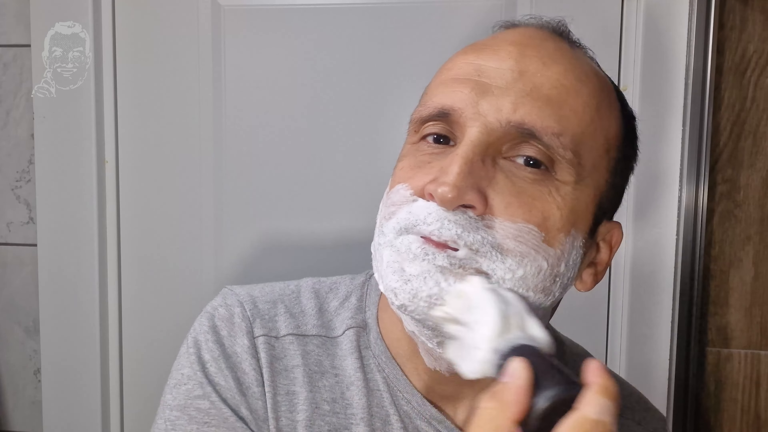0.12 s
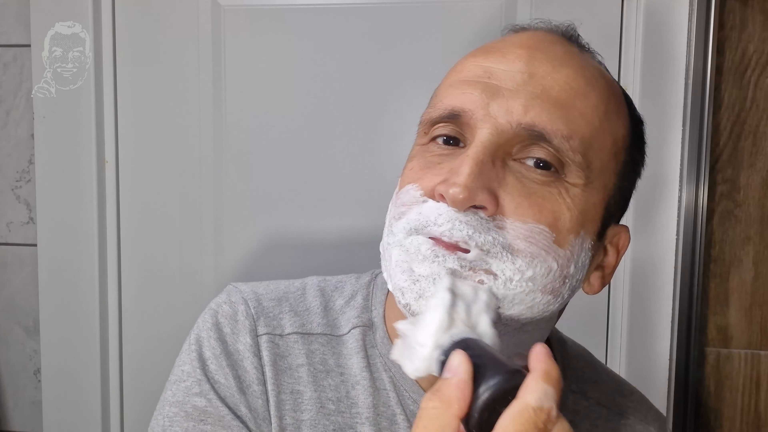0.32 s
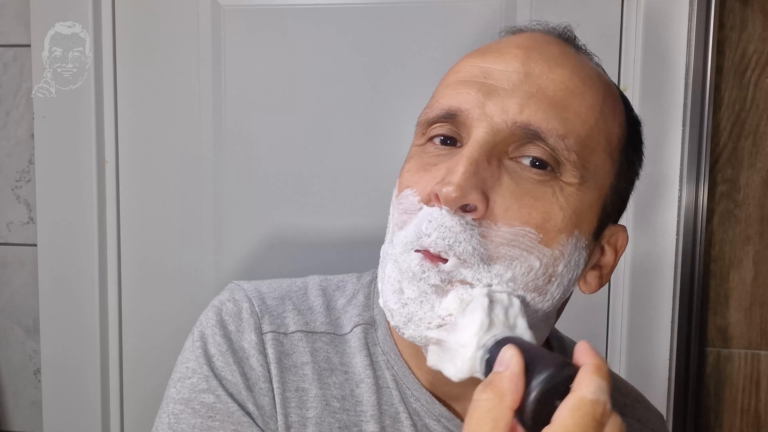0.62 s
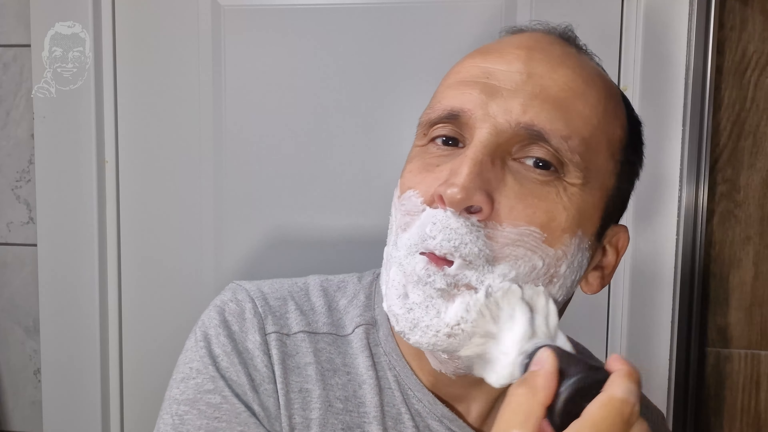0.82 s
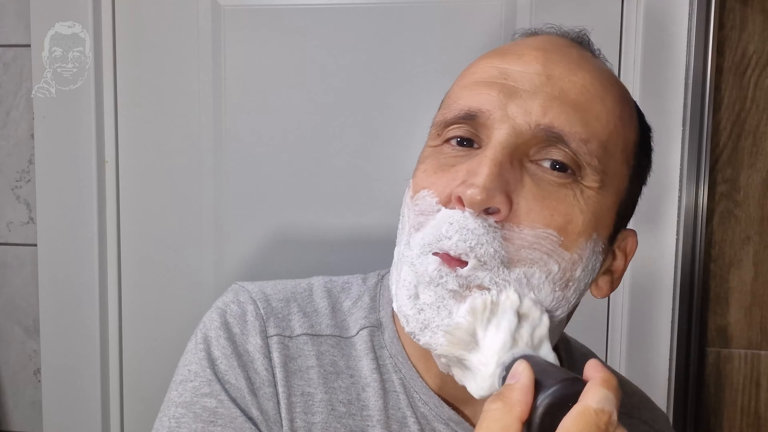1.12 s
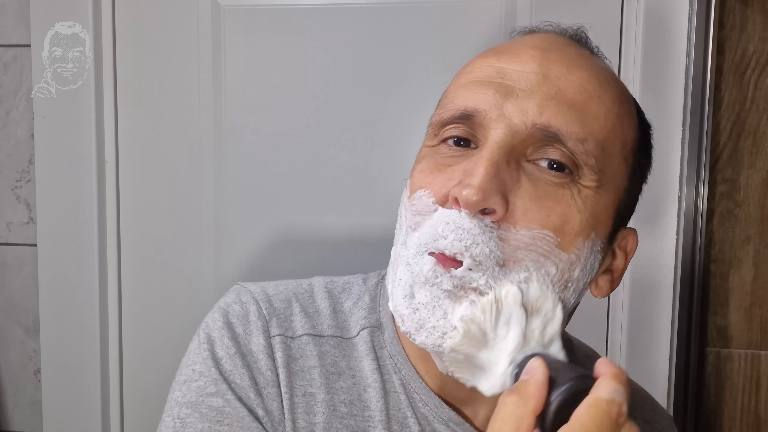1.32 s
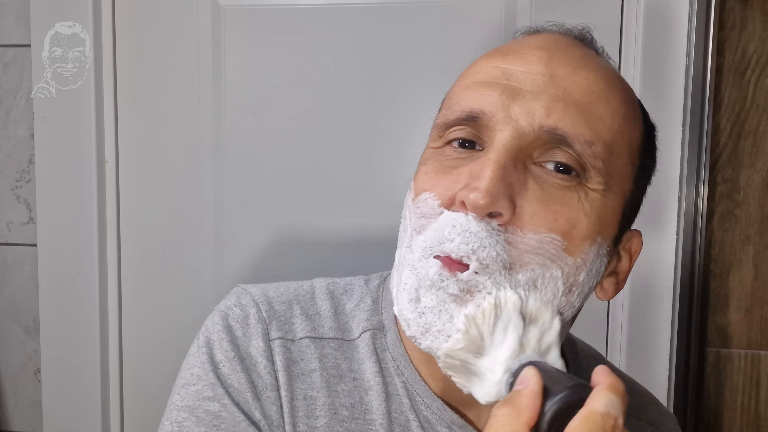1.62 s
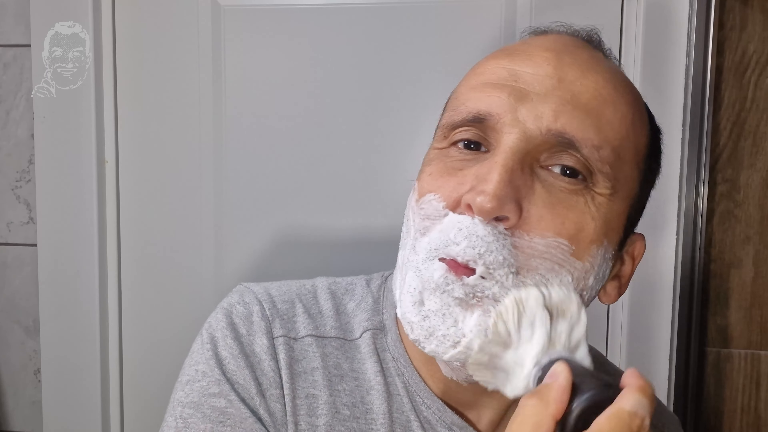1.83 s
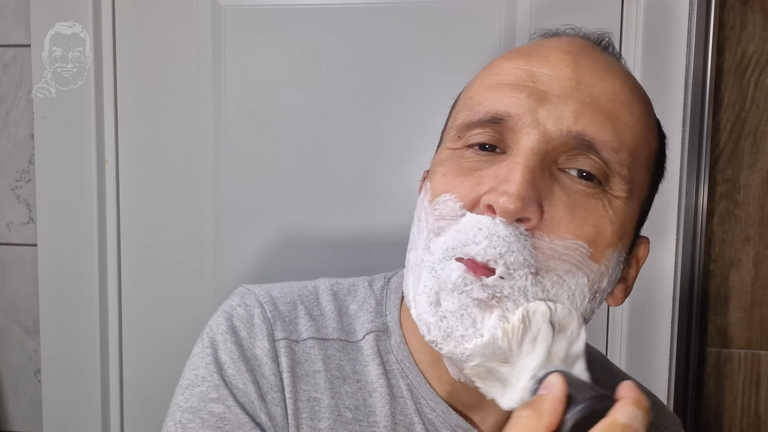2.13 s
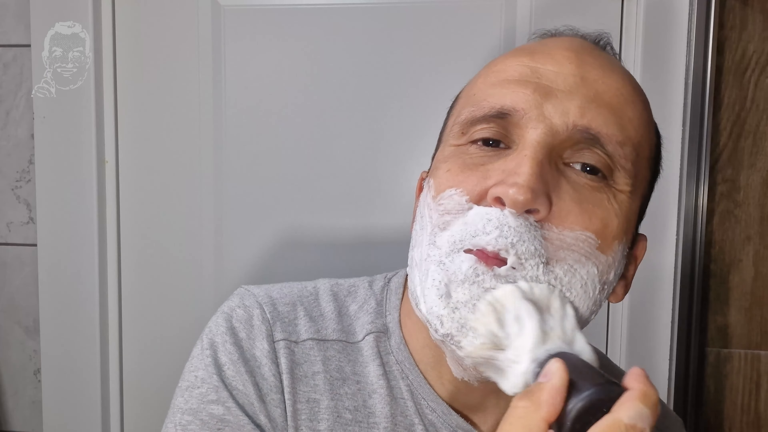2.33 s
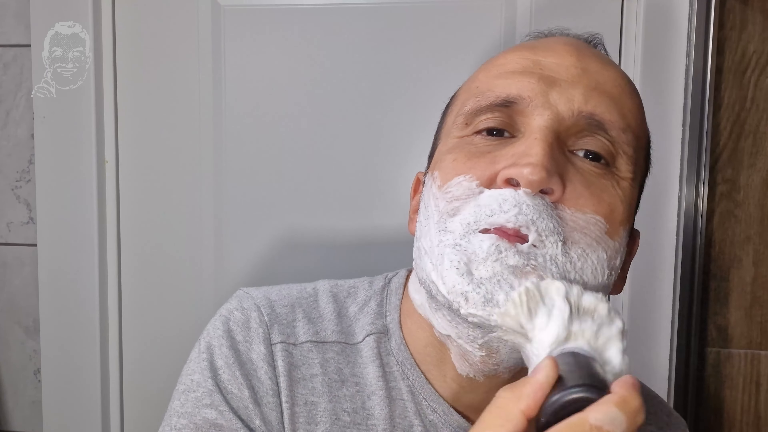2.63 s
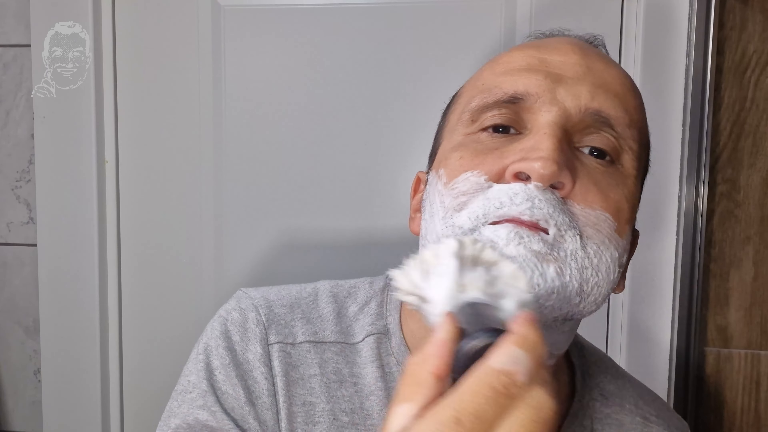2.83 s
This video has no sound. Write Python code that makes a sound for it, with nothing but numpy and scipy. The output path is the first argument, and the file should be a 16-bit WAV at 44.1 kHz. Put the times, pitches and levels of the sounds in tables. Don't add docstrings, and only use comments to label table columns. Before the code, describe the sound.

A wet shaving brush swishes over a lathered face. Strong soft strokes come at 0.25 and 0.55 s, another near 0.8, then gentler scrubs roughly every 0.1-0.15 s until 1.8, with squelch and tiny bubble pops. It thins near 1.9, brushes again at 2.05-2.45, flicks crisply at 2.7, fades, and a light airy stroke begins at 3.0. Faint hiss, short tiled echo, close phone microphone.

```python
import sys
import numpy as np
from scipy import signal
from scipy.fft import rfft, irfft
from scipy.io import wavfile
from scipy.ndimage import uniform_filter1d

SR = 44100
rng = np.random.default_rng(int(sys.argv[2]) if len(sys.argv) > 2 else 0)


def voltage_ratio(level):
    return 10 ** (np.asarray(level, float) / 20)


def digitize_waveform(pressure):
    field = np.atleast_2d(pressure).T
    bounded = np.clip(field, -1, 1)
    quanta = np.round(bounded * 32767).astype(np.int16)
    wavfile.write(sys.argv[1], SR, quanta)


N = 132300

# (frequency [Hz], density [dB per Hz])
HISS_SPECTRUM = [(18, -65), (35, -30), (80, -27.5), (300, -22), (700, -16.5), (4500, -27), (6500, -20.5),
                 (15000, -28)]
# (peak [s], rise [s], fall [s], level [dB])
PEEL_STROKES = [
    (.354, 0.003, 0.054, -52),
    (.68, 0.015, .03, -51.5),
    (.754, 0.003, 0.03, -52.5),
    (.96, 0.052, 0.066, -56),
    (1.23, 0.046, 0.027, -51.5),
    (1.49, 0.029, 0.027, -55),
    (1.703, 0.004, 0.03, -54),
    (2.29, .05, 0.04, -55.5),
    (2.49, 0.055, 0.043, -62.5),
    (2.81, 0.05, 0.058, -60.5),
]
# (start [s], peak level [dB], pitch [Hz])
BUBBLE_POPS = [(0.3517, -28, 3540), (0.674, -25, 3400), (0.7573, -35, 4050), (0.93, -33, 3630),
               (0.7508, -37, 3500), (.764, -36, 3000), (.8715, -37, 4300), (.996, -31, 3000),
               (1.107, -31, 4000), (1.237, -33, 3200), (1.246, -32, 2490), (1.4555, -35, 3500),
               (1.699, -32, 4000), (1.711, -33, 4300), (1.7182, -31, 3800), (1.741, -33, 2900),
               (1.748, -34, 2900), (1.9515, -35, 3800), (1.956, -29, 3800), (2.2965, -34, 3500),
               (2.416, -40, 4480), (2.4435, -34, 4000), (2.501, -42, 3000), (2.518, -39, 2800),
               (2.613, -44, 3500), (2.79, -41, 2900), (2.828, -43, 3000), (0.9685, -29.5, 3220),
               (1.1752, -34, 3860), (1.2292, -30, 1100), (1.5155, -36, 1100), (1.2098, -25, 4000),
               (1.225, -34, 3530), (1.2294, -20.5, 2770), (1.4745, -32, 3840), (1.489, -29, 3150),
               (1.498, -27, 3900), (1.5156, -24, 3020), (1.703, -29, 4290), (1.7259, -21.5, 3300),
               (2.162, -28, 3700), (2.2365, -37, 2870), (2.2764, -30, 2820), (2.299, -26, 3350),
               (2.4357, -34, 2970), (2.4672, -38, 3390), (2.482, -37, 2980), (2.5209, -39, 3400),
               (2.7666, -37.5, 3320), (2.806, -43, 3230), (2.886, -49, 1530)]
# (peak [s], rise [s], fall [s], level [dB], fizz relative to it [dB])
TIP_FLICKS = [(0.111, 0.053, 0.024, -61, -25), (0.237, 0.028, 0.038, -38, -35),
              (.192, .007, 0.013, -49.5, -30), (.496, 0.0082, 0.013, -50, -30),
              (.585, 0.018, .007, -46.5, -28), (2.137, 0.0055, .012, -42, -30),
              (2.115, 0.009, .012, -50.5, -25), (.84, .02, 0.022, -45, -25), (1.95, 0.037, 0.031, -52, -20),
              (0.405, 0.025, 0.027, -54.5, -16), (0.54, 0.025, 0.032, -36.5, -32),
              (0.706, 0.033, 0.022, -55.5, -28), (0.79, 0.025, 0.048, -42, -28),
              (0.979, 0.051, 0.034, -55.5, -19), (1.089, 0.025, 0.085, -46.5, -23),
              (1.248, 0.034, 0.036, -49.5, -25), (1.336, 0.011, 0.035, -41, -25),
              (1.515, 0.16, 0.058, -56.5, -18), (1.605, 0.012, 0.04, -47, -20),
              (1.714, 0.037, 0.03, -50.5, -21), (1.765, 0.011, 0.037, -53, -18),
              (1.855, 0.01, 0.059, -46, -20), (2.044, 0.021, 0.029, -54, -23),
              (2.165, 0.016, 0.022, -39.5, -34), (2.305, 0.089, 0.058, -62, -28),
              (2.436, 0.028, 0.02, -51, -14.5), (2.57, 0.053, 0.14, -65.5, -9),
              (2.711, 0.027, 0.017, -42.5, -19), (2.826, 0.064, 0.078, -68.5, -18),
              (3.038, 0.061, 0.1, -46, -12)]
# (peak [s], rise [s], fall [s], level [dB], squelch relative to it [dB])
FOAM_SCRUBS = [(0.099, 0.039, 0.039, -55.5, -11), (0.245, 0.034, 0.032, -36.5, -9.5),
               (0.378, 0.029, 0.051, -49, -11.5), (0.545, 0.036, 0.032, -38, -28),
               (.586, 0.022, .007, -44, -12), (.845, 0.019, .012, -44.5, -14), (2.046, .015, .006, -54, -9),
               (0.695, 0.048, 0.019, -52.5, -5.5), (0.81, 0.044, 0.039, -42.5, -8.5),
               (0.988, 0.047, 0.02, -45.5, -8), (1.117, 0.057, 0.072, -45.5, -7),
               (1.236, 0.045, 0.04, -47, -6), (1.346, 0.023, 0.093, -50, -7),
               (1.499, 0.018, 0.033, -45.5, -6.5), (1.613, 0.09, 0.032, -57.5, 0.5),
               (1.725, 0.016, 0.057, -46, -9), (1.936, 0.17, 0.21, -59, -2),
               (2.036, 0.062, 0.026, -49, -12.5), (2.177, 0.036, 0.03, -45.5, -0.5),
               (2.288, 0.028, 0.048, -51, -5), (2.445, 0.035, 0.024, -49, -6),
               (2.568, 0.066, 0.045, -54.5, -8), (2.729, 0.047, 0.0056, -40, -9.5),
               (2.805, 0.076, 0.088, -61.5, -2), (3.02, 0.063, 0.008, -52, -8.5)]
# (peak [s], rise [s], fall [s], level [dB], pitch [Hz])
WHISTLES = [(.245, 0.045, 0.04, -50.5, 1143), (.1, .03, .03, -67, 683), (0.388, 0.031, 0.038, -59.5, 1007),
            (1.51, 0.028, .04, -56, 995), (2.175, .015, 0.013, -49.5, 1020), (2.3, .03, 0.022, -59, 1040),
            (2.67, 0.027, 0.035, -61, 1140), (.83, 0.054, .03, -50, 6000), (2.45, .03, 0.034, -63, 622),
            (.42, 0.034, 0.023, -62, 1900), (1.88, 0.049, 0.028, -58, 1020),
            (2.14, 0.043, 0.059, -57.5, 1040), (2.165, 0.038, 0.033, -60.5, 12100),
            (1.393, 0.056, 0.14, -52, 3990), (1.642, 0.043, 0.058, -53, 4290),
            (1.77, 0.022, 0.022, -56.5, 1850), (1.904, 0.042, 0.078, -55.5, 3990),
            (2.0, .05, 0.016, -53, 3040), (2.276, 0.023, 0.025, -51.5, 2520),
            (2.571, 0.097, 0.032, -54.5, 2910), (2.575, 0.037, 0.018, -51, 4720),
            (2.714, 0.03, 0.02, -43.5, 4375), (2.72, 0.025, 0.015, -41.5, 2850),
            (2.81, 0.045, 0.055, -58, 2900), (1.6, .015, .03, -52, 8100), (2.71, 0.031, 0.029, -62.5, 413)]
# (peak [s], half length [s], level [dB], pitch [Hz], glide [octaves per s])
SLIDING_POCKETS = [(.08, .04, -58.5, 3700, -1), (0.834, .03, -43.5, 4300, 3), (0.922, .04, -56.5, 3920, 2),
                   (1.12, 0.042, -51, 4300, 2.5), (1.17, 0.024, -58, 1800, 0),
                   (1.734, 0.031, -49.5, 3370, -9), (1.781, 0.024, -52.5, 2720, -1),
                   (2.018, 0.042, -53, 3280, -3), (2.2, .025, -51.5, 2880, -2.5),
                   (2.729, .015, -49, 1985, -4), (1.503, 0.029, -53.5, 1756, -1),
                   (1.336, 0.034, -58, 700, -1)]
# (frequency [Hz], width [Hz], level [dB])
PEEL_RESONANCES = [(1510, 2200, -25.5), (2940, 1300, 1.5), (4300, 1300, -8), (7840, 710, -1.5)]
# (frequency [Hz], width [Hz], level [dB])
TIP_RESONANCES = [(6150, 1170, -0.5), (7550, 750, 4.5), (8095, 766, 10.5), (9270, 2240, -12)]
# (frequency [Hz], width [Hz], level [dB])
FIZZ_RESONANCES = [(10000, 1800, -13), (12360, 3000, 9.5), (14300, 2000, -20)]
# (frequency [Hz], width [Hz], level [dB])
SCRUB_RESONANCES = [(1780, 540, -6), (2772, 610, -3), (3630, 675, 0), (4638, 826, 0.5)]
# (frequency [Hz], width [Hz], level [dB])
SQUELCH_RESONANCES = [(418, 118, -11.5), (645, 240, -8), (942, 343, 0), (1486, 240, -4.5)]
# (frequency [Hz], width [Hz], level [dB])
ROOM_MODES = [(675, 36, -2), (1005, 45, 0), (1130, 36, -2), (1320, 45, -4), (1745, 70, -4)]

PATCHY_DB = 1.5
EDGE_DB, EDGE_POWER = 7.5, 1.94


def unit(x):
    return x / np.sqrt(np.mean(x ** 2))


def resonance(x, hz, width_hz):
    b, a = signal.iirpeak(min(hz, 0.45 * SR), hz / width_hz / 1.5, fs=SR)
    return signal.lfilter(b, a, signal.lfilter(b, a, x))


def wander(rate_hz):
    hold = int(SR / rate_hz)
    steps = np.repeat(rng.standard_normal(N // 20), hold)[:N]
    return unit(uniform_filter1d(steps, hold))


def slips(per_s, spread_db, wet):
    happens = rng.random(N) < per_s / SR
    size = np.minimum(rng.exponential(size=N), 4)
    sign = np.sign(rng.standard_normal(N))
    clicks = happens * voltage_ratio(spread_db * size) * sign
    return unit(clicks) + wet * rng.standard_normal(N)


def body(x, resonances, rate_hz):
    out = np.zeros(N)
    for k, (hz, width_hz, db) in enumerate(resonances):
        level = voltage_ratio(db + PATCHY_DB * wander(rate_hz)) * np.sqrt(width_hz)
        out += (-1) ** k * level * unit(resonance(x, hz, width_hz))
    return unit(out)


def strokes(table, side=False):
    columns = np.array(table).T[:, :, None]
    peak, rise, fall, db = columns[:4]
    hop = 64
    away = np.arange(0, N + hop, hop) / SR - peak
    edge = np.abs(away / np.where(away < 0, rise, fall)) ** EDGE_POWER
    shape_db = db + side * columns[-1] - EDGE_DB * edge
    pressure = np.sqrt(np.sum(voltage_ratio(shape_db) ** 2, axis=0))
    return np.interp(np.arange(N), np.arange(away.shape[1]) * hop, pressure)


def hiss():
    hz, db = np.array(HISS_SPECTRUM).T
    f = np.arange(N // 2 + 1) * SR / N + 1
    colour = voltage_ratio(np.interp(np.log(f), np.log(hz), db))
    return voltage_ratio(-68.5) * unit(irfft(rfft(rng.standard_normal(N)) * colour, N))


def tiled_echo(brush):
    t60_s, level_db, gap_s = 0.099, -14, 0.003
    t = np.arange(SR // 2) / SR
    tail = rng.standard_normal(len(t)) * voltage_ratio(-60 * t / t60_s) * (t > gap_s)
    return voltage_ratio(level_db) * signal.fftconvolve(brush, tail / np.sqrt(np.sum(tail ** 2)))[:N]


def peel():
    crackle = slips(per_s=340, spread_db=3.5, wet=0.073)
    return strokes(PEEL_STROKES) * body(crackle, PEEL_RESONANCES, rate_hz=40)


def pops():
    cycles, trim_db = 1.23, -3.5
    out, t = np.zeros(N), np.arange(200) / SR
    for at, db, hz in BUBBLE_POPS:
        swell_and_decay = (t * hz) ** 2 * np.exp(-t * hz * 3.12 / cycles)
        burst = np.sin(2 * np.pi * hz * t) * swell_and_decay
        i = int(at * SR)
        out[i:i + len(t)] += voltage_ratio(db + trim_db) * burst / np.abs(burst).max()
    return signal.sosfilt(signal.butter(2, 600, "high", fs=SR, output="sos"), out)


def tips():
    judder = voltage_ratio(1.7 * wander(80) + 0.55 * wander(300))
    rasp = slips(per_s=5200, spread_db=3.6, wet=1.0) * judder
    main = strokes(TIP_FLICKS) * body(rasp, TIP_RESONANCES, rate_hz=18)
    fizz = strokes(TIP_FLICKS, side=True) * body(rasp, FIZZ_RESONANCES, rate_hz=25)
    return main + voltage_ratio(-5.5) * fizz


def whistles(drag):
    out = np.zeros(N)
    for row in WHISTLES:
        hz = row[-1]
        out += strokes([row]) * unit(resonance(drag, hz, 0.11 * hz))
    return out


def glides(drag):
    width = 0.12
    out, t = np.zeros(N), np.arange(N) / SR
    for at, half, db, hz, octaves in SLIDING_POCKETS:
        pitch = hz * 2 ** (octaves * np.clip(t - at, -2 * half, 2 * half))
        turn = np.exp(2j * np.pi * np.cumsum(pitch) / SR)
        keep = np.exp(-2 * np.pi * width * hz / SR)
        smooth = signal.lfilter([1], [1, -2 * keep, keep ** 2], drag / turn)
        out += strokes([(at, half, half, db)]) * unit((smooth * turn).real)
    return out


def squelch(judder):
    wet = slips(per_s=1500, spread_db=4.16, wet=0.63) * judder
    scrubs, flicks = strokes(FOAM_SCRUBS, side=True), strokes(TIP_FLICKS)
    press = np.hypot(voltage_ratio(-7.0) * scrubs, voltage_ratio(-15.0) * flicks)
    room_ring = np.hypot(voltage_ratio(-7.5) * scrubs, voltage_ratio(-14.5) * flicks)
    broad = press * body(wet, SQUELCH_RESONANCES, rate_hz=22)
    return broad + room_ring * body(wet, ROOM_MODES, rate_hz=8.95)


def scrub():
    judder = voltage_ratio(1.11 * wander(70) + 0.8 * wander(250))
    drag = slips(per_s=2000, spread_db=3.1, wet=0.68) * judder
    foam = strokes(FOAM_SCRUBS) * body(drag, SCRUB_RESONANCES, rate_hz=17)
    return foam + squelch(judder) + whistles(drag) + glides(drag)


def scene():
    brush = peel() + pops() + tips() + scrub()
    fade_in = np.minimum(np.arange(N) / SR / 0.02 + 0.87, 1)
    return ((hiss() + tiled_echo(brush) + brush) * fade_in)[None]


def top_cut(x):
    return signal.sosfilt(signal.butter(12, 15570, fs=SR, output="sos"), x)


def record(dry):
    for hz, share in ((5500, 0.33), (6750, 0.32)):
        b, a = signal.iirnotch(hz, 7.0, fs=SR)
        dry = dry + share * (signal.lfilter(b, a, dry) - dry)
    treble_limit = signal.ellip(8, 0.2, 30, 15080, fs=SR, output="sos")
    mix = signal.sosfilt(treble_limit, dry)
    return top_cut(mix)


dry = scene()
out = record(dry)
digitize_waveform(out)
```